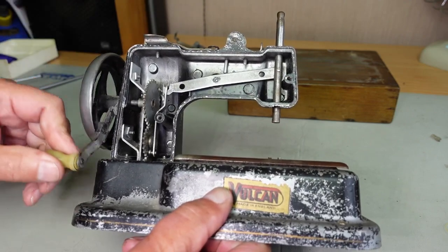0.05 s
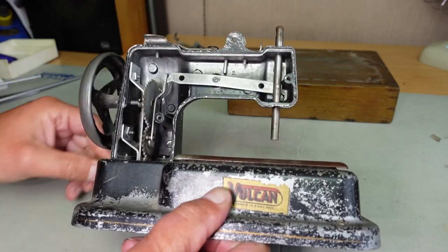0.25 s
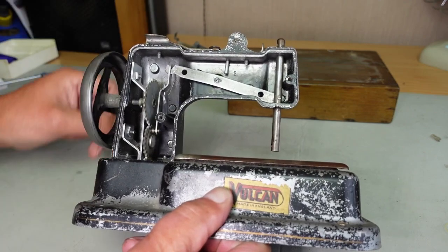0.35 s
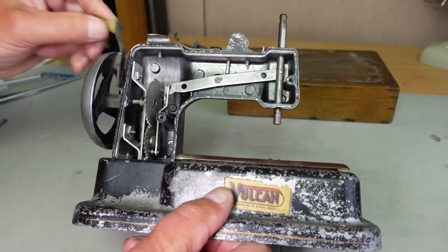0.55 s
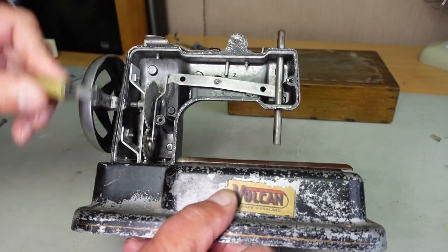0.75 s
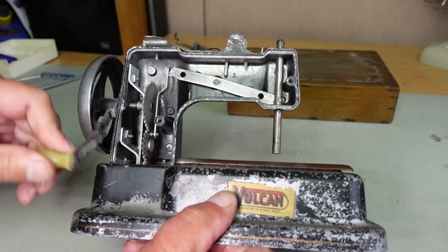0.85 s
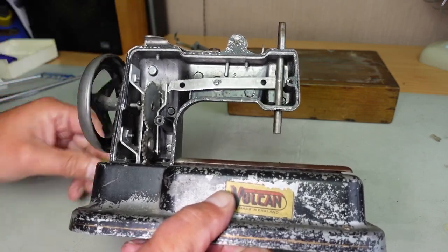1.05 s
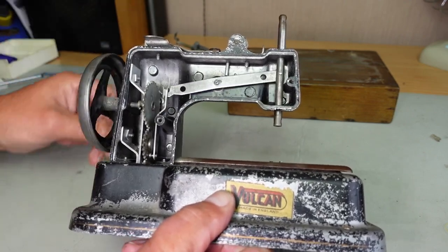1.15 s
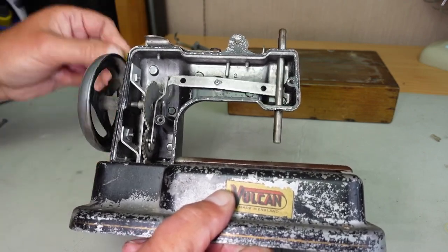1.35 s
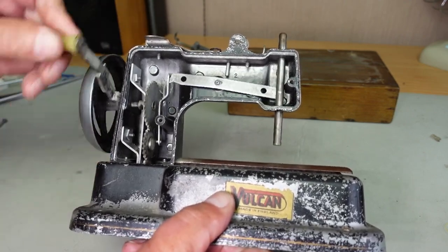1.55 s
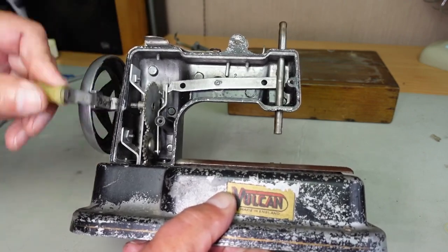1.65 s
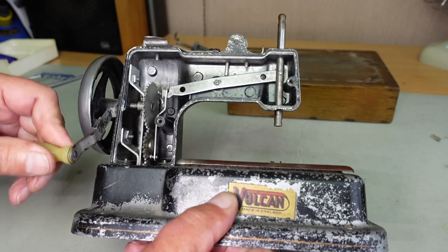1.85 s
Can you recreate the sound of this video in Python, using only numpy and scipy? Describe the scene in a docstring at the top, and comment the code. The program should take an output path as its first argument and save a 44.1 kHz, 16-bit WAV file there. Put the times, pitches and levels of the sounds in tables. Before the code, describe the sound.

Loose metal gears of a toy sewing machine clatter unevenly as it is cranked by hand.

```python
"""Toy sewing machine, cranked by hand

On a bench in a small workshop, close to the microphone. The loose gears and needle bar of the little
cast-metal machine knock and chatter, ringing its frame; a dry bearing squeaks once as the wheel starts.
Underneath, the bench rumbles, the room answers and the microphone hisses."""
import sys
import numpy as np
from scipy import signal
from scipy.fft import rfft, irfft, next_fast_len
from scipy.io import wavfile
from scipy.ndimage import uniform_filter1d, map_coordinates

SR = 44100
rng = np.random.default_rng(int(sys.argv[2]) if len(sys.argv) > 2 else 0)


def file_out(sig):
    """Save sig as 16-bit WAV at sys.argv[1]."""
    # one column per channel
    cols = np.atleast_2d(sig).T
    # limit, then scale
    lim = np.clip(cols, -1, 1)
    pcm = np.round(lim * 32767).astype(np.int16)
    wavfile.write(sys.argv[1], SR, pcm)


N = 83790
EVEN_HZ = 350  # bursts and chatter have no chance spectral peaks wider than this


def amp(db):
    """dB to gain."""
    return 10 ** (np.asarray(db) / 20)


def unit(x):
    """x scaled to rms 1."""
    return x / np.sqrt(np.mean(x ** 2) + 1e-20)


def curves(rows):
    """One value per sample for each column after the time."""
    times, *columns = np.transpose(rows)
    return [np.interp(np.arange(N) / SR, times, column) for column in columns]


def wobble(rate):
    """A smooth random curve, rate knots a second."""
    return map_coordinates(rng.standard_normal(int(N * rate / SR) + 4), [np.arange(N) * rate / SR])


def coloured(x, points):
    """x shaped by (f/Hz, level/dB) points on a log frequency axis."""
    size = next_fast_len(x.shape[-1] + 8192)
    hz, db = np.transpose(points)
    gain = amp(np.interp(np.log(np.fft.rfftfreq(size, 1 / SR) + 1), np.log(hz + 1), db))
    return irfft(rfft(x, size) * gain, size)[..., :x.shape[-1]]


# Noise floor of the microphone: f/Hz, relative level/dB
HISS_SPECTRUM = [(300, -17), (379, -50), (584, -19.5), (2250, -31), (12700, -19), (16000, -19)]


def microphone_hiss(level_db=-68.5, side_db=-13.5):
    """The microphone's own steady noise, nearly the same left and right."""
    mid, side = amp(level_db) * unit(coloured(rng.standard_normal((2, N)), HISS_SPECTRUM))
    side = amp(side_db) * side
    return np.array([mid + side, mid - side])


# Decay of the workshop: f/Hz, t60/s
ROOM_DECAY = [(200, 0.57), (2000, 0.21), (10000, 0.094)]
# Faint left-right difference, mostly in the top treble; otherwise the sound is centred: f/Hz, level/dB
SIDE_SPECTRUM = [(300, -34), (4000, -88), (9000, -15.5)]


def workshop(x):
    """The small room answers x; the lows linger longest."""
    hz, t, noise = signal.stft(rng.standard_normal((2, SR // 2)), SR, nperseg=256)
    t60 = np.interp(hz, *np.transpose(ROOM_DECAY))[:, None]
    tail = signal.istft(noise * amp(-60 * t / t60), SR, nperseg=256)[1]
    delayed = np.pad(x, (300, 0))  # the tail starts about 7 ms late
    mid, side = signal.fftconvolve(delayed[None], tail / np.linalg.norm(tail[0]), axes=1)[:, :N]
    side = coloured(side, SIDE_SPECTRUM)
    return np.array([mid + side, mid - side])


# Shaking of the bench under the machine: t/s, level/dB
SHAKE_LEVELS = [(0, -71), (.3, -57.5), (.445, -48), (.55, -59.5), (.6, -45), (.68, -61.5), (1.3, -54.5),
                (1.52, -50.5), (1.7, -59.5), (1.9, -65.5)]
# Colours of the shaking and of a low hum: f/Hz, relative level/dB
SHAKE_SPECTRUM = [(140, -19), (200, 5.5), (350, 5.5), (460, -0.5), (600, -48)]
HUM_SPECTRUM = [(20, -28), (40, -7), (55, 1), (64, -1.5), (80, -12.5), (105, -1), (128, 0), (155, -18),
                (400, -42.5)]


def bench(hum_db=-56, hum_follows=0.48):
    """The bench top shakes with the cranking; a low hum swells a little with it."""
    db, = curves(SHAKE_LEVELS)
    shake = amp(db + 1.43 * wobble(30.24)) * unit(coloured(rng.standard_normal(N), SHAKE_SPECTRUM))
    swell_db = hum_follows * (db - db.mean())
    hum = amp(hum_db + swell_db) * unit(coloured(rng.standard_normal(N), HUM_SPECTRUM))
    return shake + hum


def ring(modes, count, scatter_db=1.5, scatter_rad=.6):
    """Metal ringing from count slightly different blows, each of energy 1."""
    t = np.arange(SR // 5) / SR
    hz, db, t60 = np.transpose(modes)[:, :, None]
    fade = amp(db - 60 * t / t60) * (1 - np.exp(-t * hz))  # each mode rises in about one cycle
    draw = rng.standard_normal((count, 2, len(modes)))
    # Neighbouring modes start opposed, so the ring swells.
    start_phase = np.pi * np.arange(len(modes)) + scatter_rad * draw[:, 0]
    size = amp(scatter_db * draw[:, 1])
    sines, cosines = fade * np.sin(2 * np.pi * hz * t), fade * np.cos(2 * np.pi * hz * t)
    out = (size * np.cos(start_phase)) @ sines + (size * np.sin(start_phase)) @ cosines
    return out / np.linalg.norm(out, axis=1, keepdims=True)


def burst(spectrum, t60, count, crack_db=7, crack_s=.0012, rise_s=.0003):
    """The unpitched part of count impacts: a crack, then dying noise, each of energy 1."""
    t = np.arange(SR // 5) / SR
    crack = 1 + amp(crack_db) * np.exp(-t / crack_s)
    envelope = amp(-60 * t / t60) * crack * (1 - np.exp(-t / rise_s))
    noise = rng.standard_normal((count, len(t)))
    lumps = uniform_filter1d(abs(rfft(noise * envelope)) ** 2, size=EVEN_HZ // 5, axis=1)
    even_noise = irfft(rfft(noise) / np.sqrt(abs(lumps)), len(t))
    out = coloured(even_noise, spectrum) * envelope
    return out / np.linalg.norm(out, axis=1, keepdims=True)


# Modes of the cast frame, arm, gears and teeth: f/Hz, relative level/dB, t60/s
FRAME_MODES = [(530, -11, .05), (610, -11, .05), (690, -6, .045), (745, -1, .08), (800, -7, .04),
               (857, -1, .08)]
ARM_MODES = [(1207, 0.5, 0.032), (1326.6, 7, 0.07), (1434, -3.5, 0.071)]
GEAR_MODES = [(1900, -2, .05), (2240, -3, .035), (2465, -2, .045), (2800, -4, .03), (3070, -2, .04),
              (3400, -5, .025)]
TOOTH_MODES = [(4060, 0, .035), (4250, -3, .025), (4570, -7, .035), (4950, -7, .03), (5420, -7, .035),
               (7500, -11, .025)]
# Noise of a gear clack, a tooth snap and a bright tick: f/Hz, relative level/dB
CLACK_SPECTRUM = [(150, -59), (300, 9.5), (470, -4.5), (1000, 6.5), (1700, 9.5), (3200, 7), (4500, -55)]
SNAP_SPECTRUM = [(2400, -21), (3600, 0.5), (5000, -2), (6500, -9.5), (11000, -24)]
TICK_SPECTRUM = [(4500, -4), (6800, 2.5), (8000, 4), (11000, -1), (13500, -12.5), (16000, -36)]


def metal_contacts(count, noise_db=8):
    """Metal strikes metal count times: frame ring, arm ring, gear clack, tooth snap and bright tick."""
    frame, arm, gears, teeth = (ring(m, count) for m in (FRAME_MODES, ARM_MODES, GEAR_MODES, TOOTH_MODES))
    clack = gears + amp(noise_db) * burst(CLACK_SPECTRUM, t60=.055, count=count)
    snap = teeth + amp(noise_db) * burst(SNAP_SPECTRUM, t60=.055, count=count)
    tick = burst(TICK_SPECTRUM, t60=.038, count=count)
    return np.array([frame, arm, clack, snap, tick])


# Teeth meshing between the knocks: t/s, then level/dB of frame, gears, treble
MESH_LEVELS = [(0, -75, -73, -84), (.15, -65, -64.5, -79), (.28, -54, -51.5, -66), (.42, -44.5, -42.5, -48),
               (.53, -47, -50, -58), (.69, -50.5, -55, -67), (.92, -48, -42, -51), (.99, -63, -55.5, -74),
               (1.12, -56.5, -50.5, -61), (1.261, -64.5, -61, -67), (1.35, -42, -47, -58),
               (1.43, -52.5, -53, -64), (1.53, -43.5, -42.5, -46.5), (1.68, -65, -57.5, -64),
               (1.84, -79, -66.5, -86), (1.9, -58, -71, -78)]
# Duller tick of a light contact: f/Hz, relative level/dB
LIGHT_TICK_TILT = [(7000, 7), (15000, -5.5)]


def gear_mesh(contacts_per_s=1300, spread_db=1.8, flicker_db=4.4, variants=4):
    """Teeth and pivots touch lightly and at random all the time the wheel turns."""
    frame, arm, clack, snap, tick = metal_contacts(variants)
    touching = rng.random((variants, N)) < contacts_per_s / variants / SR
    touches = touching * amp(spread_db * rng.exponential(size=(variants, N)))
    voices = [frame + 0.3 * arm, clack + 0.48 * snap, coloured(tick, LIGHT_TICK_TILT)]
    out = np.zeros(N)
    for db, voice in zip(curves(MESH_LEVELS), voices):
        patter = signal.fftconvolve(touches, voice, axes=1)[:, :N].sum(0)
        out += amp(db + flicker_db * wobble(40.22)) * unit(patter)
    return out


# Path of the bearing's whistle: t/s, f/Hz, level/dB, jitter/fraction of f
SQUEAK_PATH = [(.177, 9300, -36, 0.037), (.181, 8400, -49, .06), (.19, 7900, -43, 0.03),
               (.2, 7200, -57, .04), (0.207, 6700, -24, .006), (0.211, 6605, -23.5, .006),
               (0.224, 6685, -23, .008), (0.227, 6290, -29.5, .015), (.231, 5817, -19, 0.0076),
               (.241, 6026, -23, 0.0084), (.244, 6140, -30, 0.014), (.251, 6000, -43, 0.018),
               (.259, 5980, -32, 0.013), (.264, 5800, -52, 0.0202)]
# Modes of the shaft: f/Hz, relative level/dB, t60/s
SHAFT_MODES = [(5800, -7.5, 0.14), (6000, -2, .18), (6700, 0, .16), (6640, -8, 0.32)]


def bearing_squeak(octave_db=-32, rough_db=1.6, shaft_db=-33):
    """A dry bearing sticks and slips: a falling whistle, scratchy at first; the shaft rings on."""
    hz, db, jitter = uniform_filter1d(curves(SQUEAK_PATH), size=SR // 500, axis=1)
    t = np.arange(N) / SR
    start, end = SQUEAK_PATH[0][0], SQUEAK_PATH[-1][0]
    gate = np.clip(np.minimum(t - start, end - t) / 0.0015, 0, 1)
    phase = 2 * np.pi * np.cumsum(hz * (1 + jitter * wobble(2000))) / SR
    wave = np.sin(phase) + amp(octave_db) * np.sin(2 * phase)
    whistle = np.sqrt(2) * gate * amp(db + rough_db * wobble(440)) * wave
    shaft = ring(SHAFT_MODES, count=1, scatter_db=0)[0]
    return whistle + amp(shaft_db) * signal.fftconvolve(whistle, shaft)[:N]


# Knocks of gears and needle bar, close up: t/s, then relative level/dB of frame, arm, clack, snap, tick
KNOCK_LEVELS = [(0.104, -42, -90, -78, -79, -73), (0.165, -30.5, -46, -49, -67, -55),
                (0.227, -39.5, -39, -44.5, -49, -54), (0.299, -23, -30, -38.5, -38.5, -52),
                (0.341, -25, -34.5, -38, -43.5, -65), (0.355, -23.5, -50, -41, -34, -43),
                (0.374, -34, -36, -31.5, -27, -39), (0.395, -23, -26, -34.5, -33, -42),
                (0.407, -52, -46, -34.5, -29.5, -54), (0.432, -34, -34, -37.5, -35, -44),
                (0.469, -27, -36, -37, -38, -42.5), (0.486, -39, -35, -43, -48, -46),
                (0.494, -23, -46, -32.5, -33.5, -34), (0.515, -23, -25.5, -36, -33, -42),
                (0.539, -28, -40, -66, -61, -52), (0.56, -53, -48, -38.5, -43, -43),
                (0.577, -31, -50, -39, -48, -49), (0.595, -55, -45, -43.5, -46.5, -46),
                (0.621, -27, -46, -38, -43.5, -65), (0.659, -34.5, -61, -71, -65, -59),
                (0.703, -37.5, -44, -64, -65, -71), (0.7462, -32, -53, -34, -38.5, -67),
                (0.78, -22.5, -31, -37, -54, -55), (0.7987, -24.5, -24.5, -32, -33, -33),
                (0.84, -29, -52, -34.5, -26, -31), (0.863, -28.5, -53, -49, -56, -44),
                (0.893, -25, -31.5, -35.5, -38.5, -42), (0.907, -28, -49, -38.5, -35.5, -40),
                (0.92, -29, -40, -42.5, -42, -51), (0.944, -31.5, -38, -49, -53, -63),
                (1.026, -47, -50, -48, -50, -58), (1.032, -28, -29.5, -33.5, -36, -53),
                (1.059, -23, -24.5, -37, -36, -38.5), (1.139, -37, -53, -42, -48, -54),
                (1.163, -35.5, -47, -38, -42.5, -42.5), (1.204, -35.5, -75, -45, -71, -62),
                (1.296, -35, -53, -42.5, -48.5, -68), (1.342, -31.5, -50, -34.5, -38, -56),
                (1.402, -22.5, -27, -33.5, -34, -36.5), (1.443, -31.5, -40, -47, -57, -59),
                (1.457, -31.5, -29.5, -34.5, -33.5, -31), (1.478, -27, -57, -36, -33, -34),
                (1.501, -25, -40, -38.5, -37.5, -32.5), (1.518, -25, -42, -35, -35, -52),
                (1.539, -30, -44, -36, -37, -36), (1.562, -27, -32, -36, -38.5, -43),
                (1.582, -31.5, -39, -37.5, -40, -42), (1.606, -30, -28.5, -36, -39.5, -48),
                (1.633, -24, -26.5, -33, -35.5, -35.5), (0.724, -47, -58, -47, -52, -57.5),
                (1.696, -59, -45, -43.5, -51.5, -63), (1.798, -39.5, -59, -53.5, -50, -55)]
PART_TRIM_DB = [-7, -5.5, -6.5, -9.5, -6]  # added to those five levels


def knocks(bounces=6, chatter_s=.006, loss_db=20):
    """Each knock rings the casting once, while the gear teeth chatter in a few ever weaker contacts."""
    out = np.zeros(N + SR)
    voices = metal_contacts(len(KNOCK_LEVELS)) * np.sqrt(SR / 200)
    length = voices.shape[-1]
    lateness = rng.random((len(KNOCK_LEVELS), bounces))  # as a share of chatter_s
    lateness[:, 0] = 0
    for k, (start, *part_db) in enumerate(KNOCK_LEVELS):
        frame, arm, *teeth = amp(np.add(part_db, PART_TRIM_DB))[:, None] * voices[:, k]
        impulses = np.bincount((lateness[k] * chatter_s * SR).astype(int), amp(-loss_db * lateness[k]))
        comb = rfft(impulses, 2 * length)
        lumps = uniform_filter1d(abs(comb) ** 2, size=EVEN_HZ * 2 // 5)
        even_comb = comb / np.sqrt(abs(lumps))
        chatter = irfft(rfft(sum(teeth), 2 * length) * even_comb)[:length]
        out[round(start * SR):][:length] += frame + arm + chatter
    return out[:N]


def scene():
    """The machine close and centred on its bench, the workshop faint behind it."""
    rattle = knocks() + gear_mesh()
    squeak = bearing_squeak()
    room = workshop(amp(-13) * rattle + amp(-15) * squeak)
    return rattle + squeak + room + bench()


def record(dry, rolloff_hz=16000, top_hz=15800):
    """The microphone adds its hiss and softens the top treble; nothing passes above top_hz."""
    size = next_fast_len(N + 8192)
    hz = np.fft.rfftfreq(size, 1 / SR)
    response = (hz < top_hz) / (1 + (hz / rolloff_hz) ** 8)
    return irfft(rfft(dry + microphone_hiss(), size) * response, size)[:, :N]


dry = scene()
out = record(dry)
file_out(out)
```